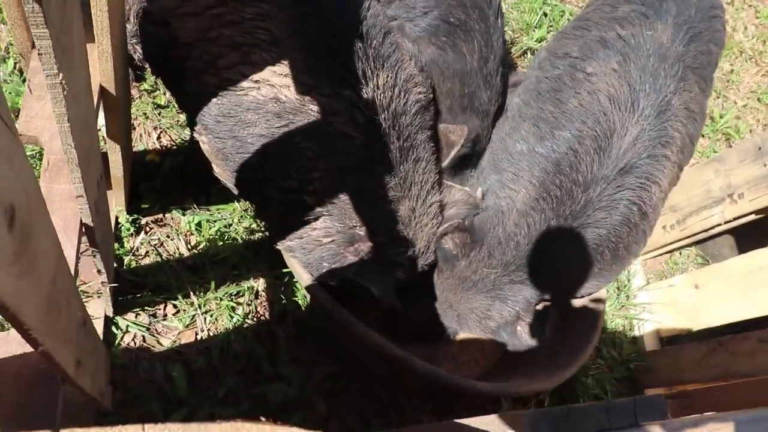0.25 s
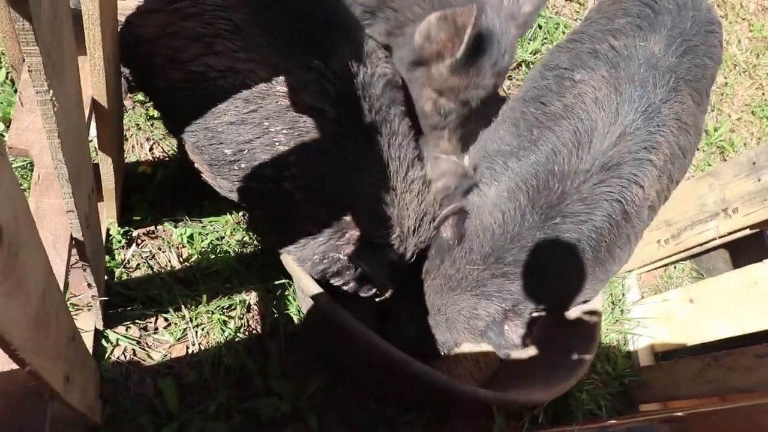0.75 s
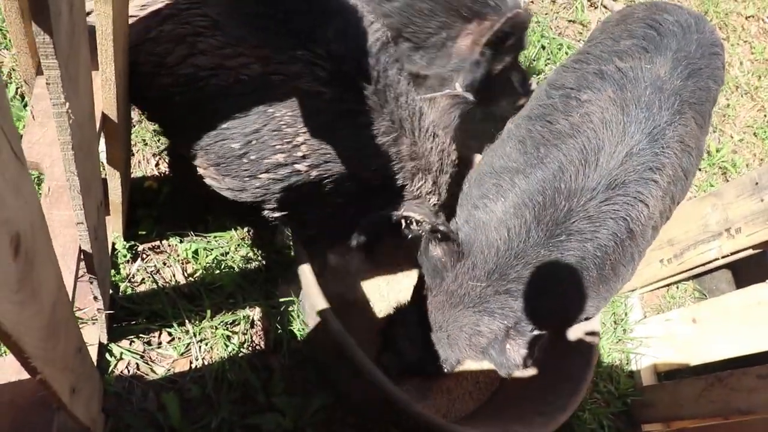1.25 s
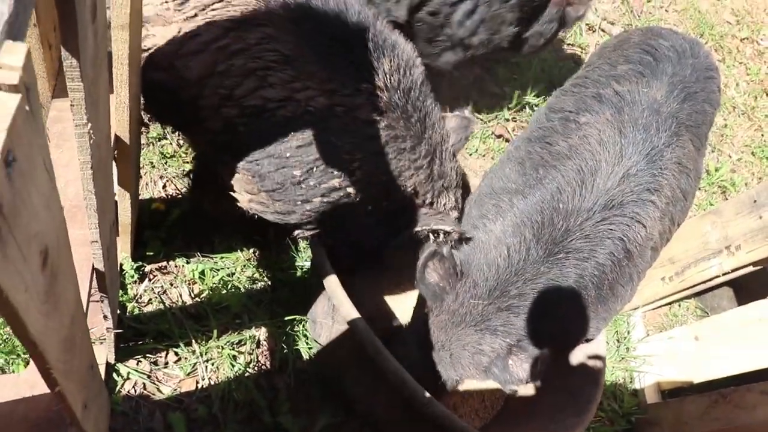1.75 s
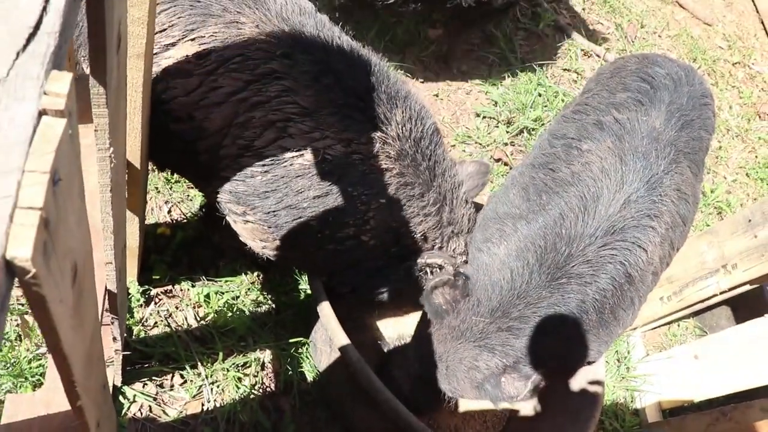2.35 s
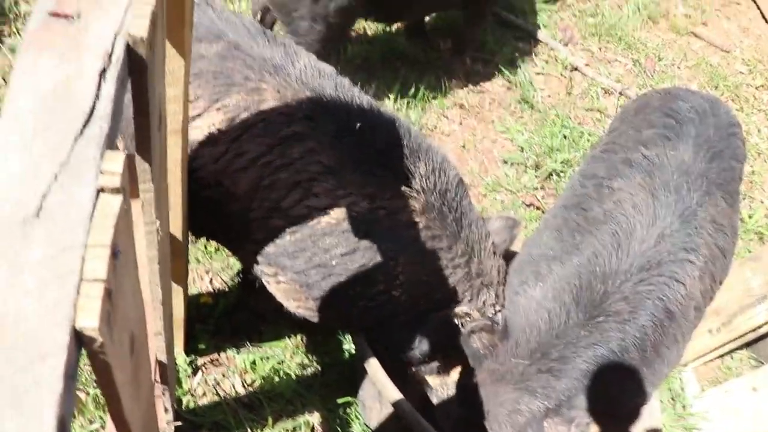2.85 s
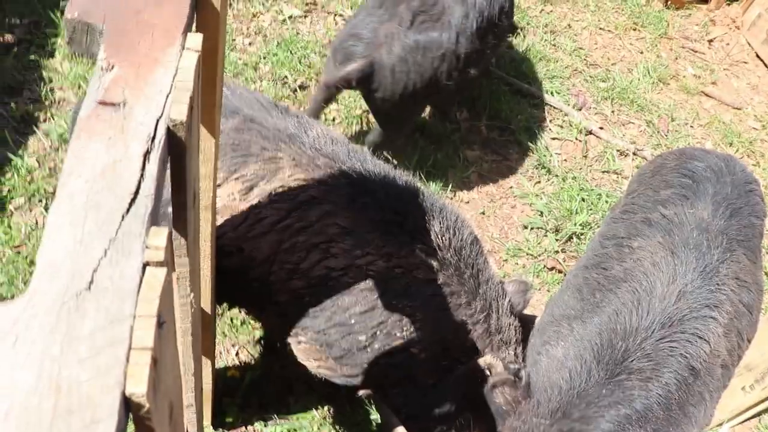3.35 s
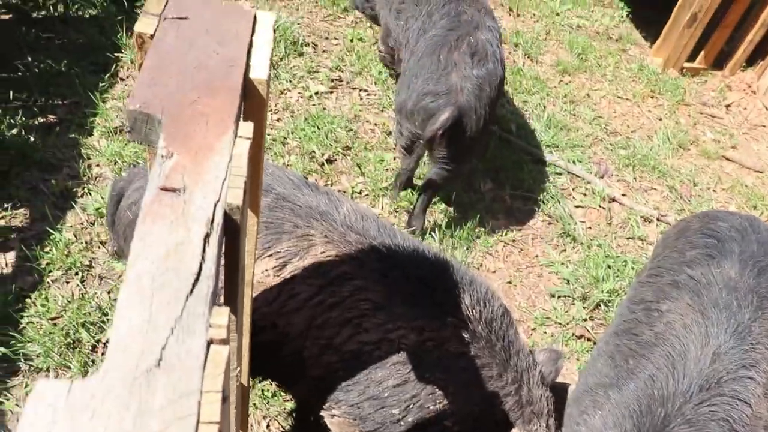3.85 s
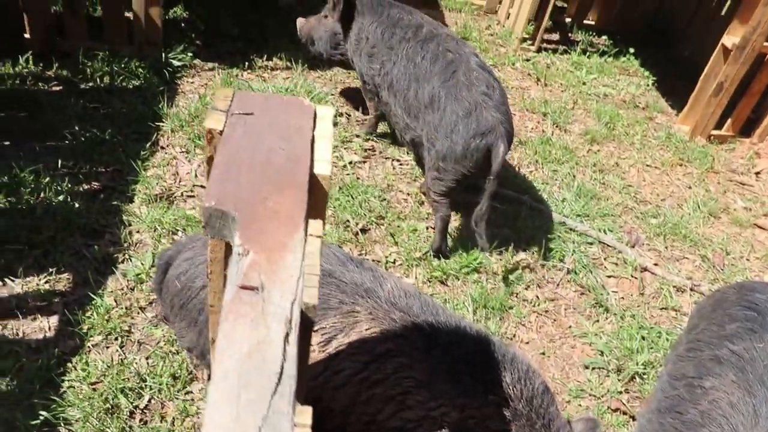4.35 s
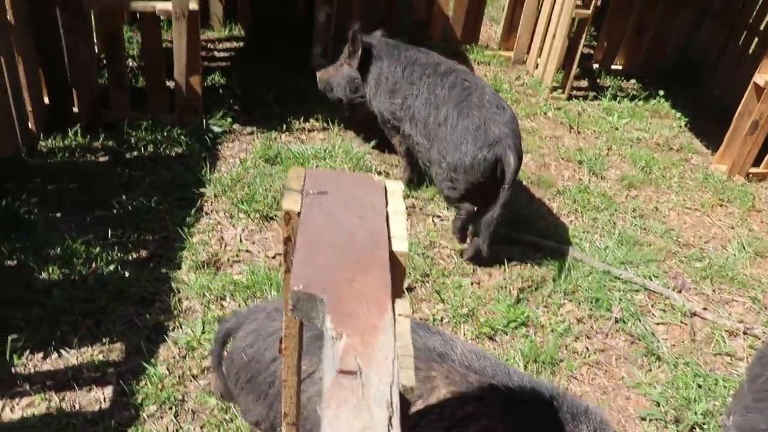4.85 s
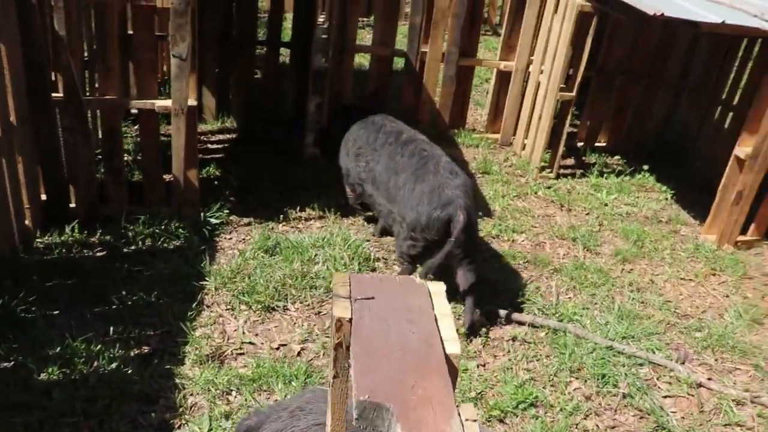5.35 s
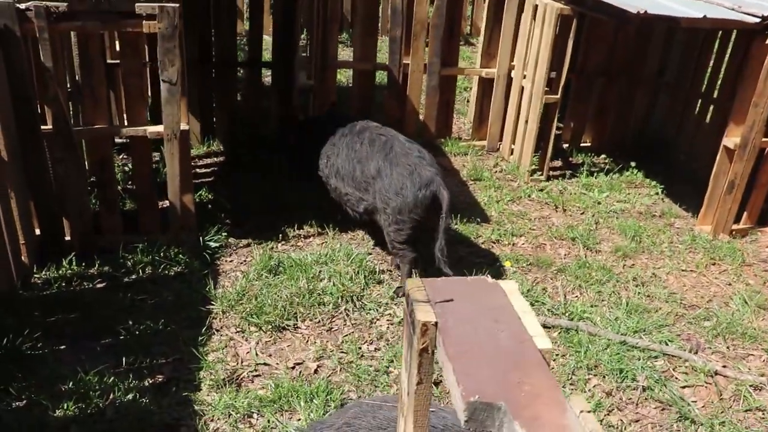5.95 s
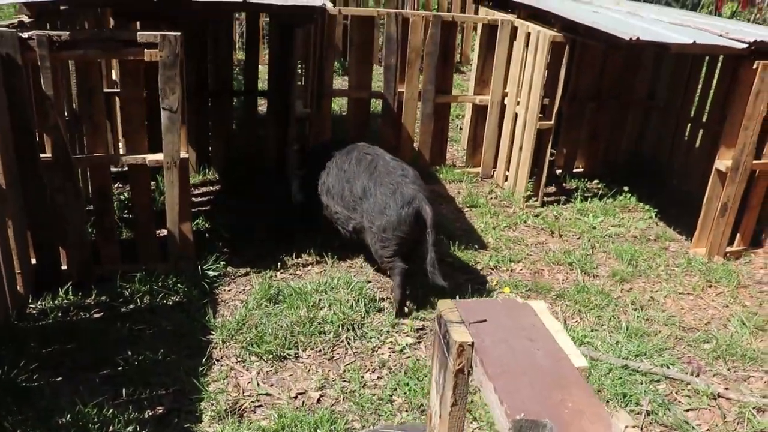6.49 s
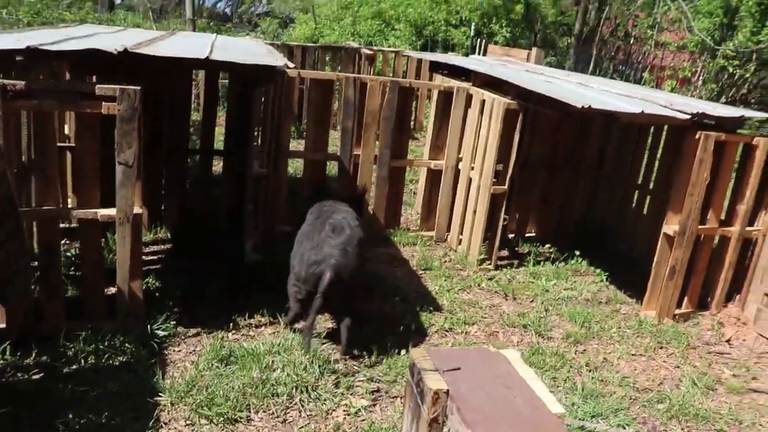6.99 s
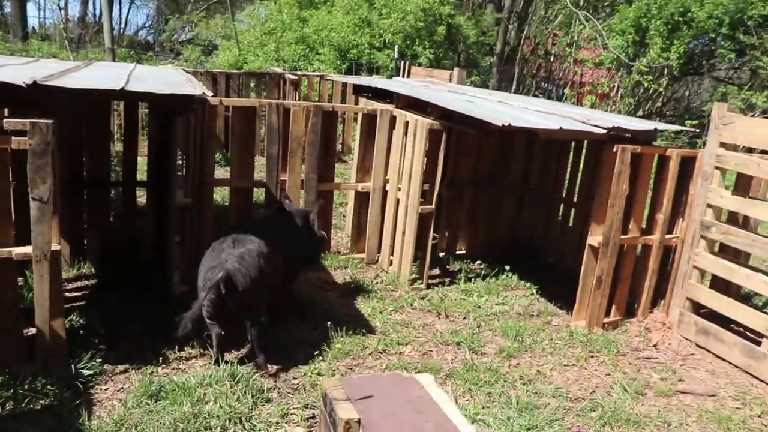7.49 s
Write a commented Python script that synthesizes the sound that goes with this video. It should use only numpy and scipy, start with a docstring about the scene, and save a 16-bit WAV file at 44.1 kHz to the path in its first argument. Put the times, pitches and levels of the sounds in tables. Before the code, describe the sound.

Close smacking and crunching of pigs eating outdoors, with a brief creaky grunt, a snuffle and occasional bumps on their feed pan.

```python
"""An outdoor pen, with a small microphone close to pigs feeding from a pan.
Jaws squelch wet feed and crackle dry grain, single grains split, and lips smack as they part.
Snouts rub the pan along the ground and knock its wall. One pig gives a short creaky grunt, slow
claps of the vocal folds ringing in its throat; one snuffles, air fluttering in its nostrils.
A faint open-air hiss and rumble lies behind it all."""
import sys
import numpy as np
from scipy import signal
from scipy.fft import rfft, irfft, next_fast_len
from scipy.io import wavfile
from scipy.ndimage import uniform_filter1d

SR = 44100
rng = np.random.default_rng(int(sys.argv[2]) if len(sys.argv) > 2 else 0)


def dump_mix(stems):
    """Bounce the given channels to the path in sys.argv[1] as a 16-bit WAV at rate SR."""
    frames = np.atleast_2d(stems).T  # one column per channel
    limited = np.clip(frames, -1, 1)  # hard clip at full scale
    pcm = np.round(limited * 32767).astype(np.int16)
    wavfile.write(sys.argv[1], SR, pcm)


N = 340602


def gain_of(db):
    """Decibels to amplitude."""
    return 10 ** (np.asarray(db) / 20)


def evened(x):
    """Scales to rms 1."""
    return x / np.sqrt(np.mean(x ** 2) + 1e-20)


def curve(rows, column):
    """One column of a timed table, sample by sample."""
    rows = np.array(rows)
    return np.interp(np.arange(N) / SR, rows[:, 0], rows[:, column])


def add(mix, s, sound):
    """Mixes a sound in at s seconds."""
    part = mix[round(s * SR):][:len(sound)]
    part += sound[:len(part)]


def coloured(x, spectrum):
    """Shapes x by rows of (frequency [Hz], gain [dB]), then scales to rms 1."""
    size = next_fast_len(len(x))
    hz, db = np.transpose(spectrum)
    shape = np.interp(np.log(np.fft.rfftfreq(size, 1 / SR) + 1), np.log(hz + 1), db)
    return evened(irfft(rfft(x, size) * gain_of(shape), size)[:len(x)])


def no_bass(x, hz):
    """Rolls off what lies under hz."""
    return signal.sosfilt(signal.butter(2, hz, "high", fs=SR, output="sos"), x)


def ring(x, hz, width):
    """A two-pole resonance, width in Hz, whose impulse starts as a unit sine."""
    r, w = np.exp(-np.pi * width / SR), 2 * np.pi * hz / SR
    return signal.lfilter([0, np.sin(w)], [1, -2 * r * np.cos(w), r * r], x)


def resonate(x, hz, width):
    """A resonance that follows a pitch curve: shift down, smooth, shift back."""
    turn, r = np.exp(2j * np.pi * np.cumsum(hz) / SR), np.exp(-np.pi * width / SR)
    return (turn * signal.lfilter([1 - r], [1, -r], x / turn)).real


def grainy(per_s, spread_db, fade_s, hiss):
    """Noise broken into little bursts of uneven size over a steady share of hiss."""
    sizes = gain_of(spread_db * np.minimum(rng.exponential(1, N), 4))
    onsets = rng.random(N) < per_s / SR
    bursts = evened(signal.lfilter([1], [1, -np.exp(-1 / (fade_s * SR))], sizes * onsets))
    return (hiss + bursts) * rng.standard_normal(N)


def open_air():
    """Steady outdoor rumble and faint high hiss around the pen."""
    # colour of the air: (frequency [Hz], gain [dB])
    spectrum = [(12, -31), (20, 10.5), (108, 13), (323, 2.5), (1240, -28), (1840, -42), (6710, -36),
                (8650, -13), (10500, -9), (15200, -15), (16500, -24)]
    return gain_of(-52.5) * coloured(rng.standard_normal(N), spectrum)


def pan():
    """Snouts rub the pan along the ground and now and then knock its wall into ringing."""
    # blows, low for a shove, high near the rim: (time [s], peak [dB], pitch [ratio])
    knocks = [(0.785, -22.5, 0.44), (1.039, -17.5, 1.03), (1.155, -9, 2.17), (1.157, -16.5, 0.663),
              (1.161, -12.5, 1.44), (1.575, -23.5, 1.93), (4.9786, -6, 1.04), (5.75, -26.5, 1.02),
              (5.794, -28, 1.64), (6.024, -27.5, 1.36)]
    # wall modes at pitch 1: (frequency [Hz], gain [dB], time to fall 60 dB [s])
    modes = [(400, -6, .045), (495, 0, .024), (810, -11, .025), (1570, -13, .02), (2100, -5, .02),
             (2420, -8, .016), (2750, -9, .013)]
    # snouts push hard at first, then mostly nudge: (time [s], level [dB])
    shoves = [(0.0, -42), (0.45, -40), (1.4, -44.5), (1.65, -42), (2.47, -40.5), (2.79, -52.5), (3.8, -47),
              (4.1, -54.5), (6.45, -53), (6.65, -41.5), (6.9, -60), (7.72, -48.5)]
    # pan scraping the ground: (frequency [Hz], gain [dB])
    rub_spectrum = [(71, -57), (120, -6), (330, -7.5), (410, 3), (480, -4), (600, 1.5), (720, -6),
                    (800, -4.5), (1100, -28), (2640, -90)]
    out, t = np.zeros(N), np.arange(3000) / SR
    for s, db, pitch in knocks:
        reach_hz = 4800 * gain_of(.5 * db)  # weaker blows are duller
        blow = np.zeros(len(t))
        for hz, mode_db, t60 in modes:
            mode = gain_of(mode_db - 60 * t / t60) * np.sin(2 * np.pi * hz * pitch * t)
            blow += mode / (1 + (hz * pitch / reach_hz) ** 4)
        blow *= 1 - np.exp(-t / .0004)
        blow = no_bass(no_bass(blow, 300 * pitch), 300 * pitch)  # a thin wall radiates little bass
        blow /= abs(blow).max()
        add(out, s, gain_of(db) * blow)
        add(out, s + .0135, gain_of(db - 17) * blow)  # echo from the fence
    rub = coloured(grainy(per_s=90, spread_db=2.5, fade_s=.015, hiss=1.3), rub_spectrum)
    return out + gain_of(curve(shoves, 1)) * rub


def snuffle():
    """Fluttering air in the nostrils; two resonances rise as the snout digs in."""
    # one long breath: (time [s], level [dB], lower nasal resonance [Hz])
    breath = [(1.93, -67, 2000), (2.02, -43.5, 2070), (2.22, -35.5, 2320), (2.33, -45, 2380),
              (2.46, -61, 2500)]
    out, t = np.zeros(N), np.arange(N) / SR
    flutter = grainy(per_s=140, spread_db=1.0, fade_s=.0035, hiss=2.4)
    for ratio, width_hz, db in ((1, 350, -2), (1.4, 220, -8.5)):
        turn = np.exp(2j * np.pi * np.cumsum(ratio * curve(breath, 2)) / SR)
        r = np.exp(-np.pi * width_hz / SR)
        nasal = turn * signal.lfilter([1], [1, -2 * r, r * r], flutter / turn)
        out += gain_of(db) * evened(nasal.real)
    return out * gain_of(curve(breath, 1)) * (t > breath[0][0]) * (t < breath[-1][0])


def grunt():
    """Slow single claps of the vocal folds, each ringing out in the throat."""
    # throat modes in three registers: (frequency [Hz], width [Hz], gain [dB])
    low_modes = [(239, 28, 1)]
    mid_modes = [(1306, 104, 9), (943, 140, 2), (2018, 50, -0.5), (2780, 290, -0.5)]
    top_modes = [(3280, 48, -5)]
    start_s, strongest_s, end_s, claps_per_s = .223, .295, .40, 41.2
    swell_db_per_s, sag_db_per_s, shut_share = 298, 28, .68
    t, claps = np.arange(N) / SR, np.zeros(N)
    cycle = (t - start_s) * claps_per_s % 1
    sounding = t < end_s + .01

    clap_s = np.arange(start_s, end_s, 1 / claps_per_s)
    clap_s += .0004 * rng.standard_normal(len(clap_s))
    late = clap_s - strongest_s
    effort_db = np.minimum(swell_db_per_s * late, -sag_db_per_s * late)
    claps[(clap_s * SR).astype(int)] = gain_of(effort_db - 17.5)
    puff = .12 * np.exp(-np.arange(500) / 160) * rng.standard_normal(500)  # air leaks after each clap
    puff[:9] = np.hanning(11)[1:-1] / 4  # the clap itself
    claps = signal.oaconvolve(claps, puff)[:N]
    claps = signal.sosfilt(signal.butter(4, 4600, fs=SR, output="sos"), claps)  # soft folds close gently

    low, mid, top = (
        sum((-1) ** k * gain_of(db) * ring(claps, hz, width) for k, (hz, width, db) in enumerate(modes))
        for modes in (low_modes, mid_modes, top_modes))
    accent = np.exp(-((t - strongest_s - .006) / .012) ** 4)  # the hardest clap wakes the middle modes
    mouth_open = (1 + np.tanh((t - .31) / .035)) / 2
    upper = mid * gain_of(-6.5 + 9 * accent) + top * gain_of(-28 + 31 * mouth_open)
    folds_shut = (t - start_s + .002) * claps_per_s % 1 < shut_share
    upper *= uniform_filter1d(1. * folds_shut, size=130) * sounding  # these modes die as the folds part

    leak = np.exp(-((cycle - .3) / .17) ** 2) * mouth_open ** 9 * sounding
    whistle_hz = 4150 + 900 * cycle  # air through the folds, climbing in each cycle
    whistle = resonate(rng.standard_normal(N), whistle_hz, width=220)
    whistle = evened(resonate(whistle, whistle_hz, width=220))
    return no_bass(low + upper + gain_of(-33) * leak * whistle, 40)


def squelch():
    """Pockets of air burst in wet feed: brief puffs, each size ringing at its own pitch."""
    out = np.zeros(N)
    for hz in np.geomspace(800, 4500, 12):
        puffs = grainy(per_s=14, spread_db=2.2, fade_s=.006, hiss=.5)
        out += evened(ring(puffs, hz, width=.22 * hz)) * np.sqrt(hz)
    return evened(out)


def crackle():
    """Dry grains snap: very short ticks, each size with its own colour."""
    out = np.zeros(N)
    for hz in np.geomspace(3500, 14000, 6):
        ticks = grainy(per_s=30, spread_db=4.5, fade_s=.0007, hiss=.3)
        out += evened(ring(ticks, hz, width=.5 * hz)) * np.sqrt(hz)
    return evened(out)


def chewing(column):
    """Amplitude of the wet (1) or dry (2) feed: steady munching plus a swell at every bite."""
    # steady munching: (time [s], wet level [dB], dry level [dB])
    munching = [(0.0, -33, -52), (0.08, -37, -61), (0.17, -44, -54), (0.42, -40, -47), (0.6, -35, -38.5),
                (0.84, -50, -54.5), (0.99, -36.5, -35.5), (1.2, -35.5, -46.5), (1.42, -42.5, -42),
                (1.95, -44.5, -57.5), (2.15, -41, -42.5), (2.5, -43, -52.5), (2.92, -41, -40.5),
                (3.4, -46, -57), (4.9, -45.5, -49.5), (5.14, -40.5, -44), (5.48, -47.5, -51),
                (6.3, -48.5, -59), (7.46, -48.5, -60), (7.72, -37.5, -48.5)]
    # jaw closings: (time of the top [s], wet level [dB], dry level [dB], time scale [s])
    bites = [(0.709, -31.5, -52, 0.097), (1.107, -34.5, -67, 0.093), (1.505, -42, -35, 0.029),
             (1.638, -35, -41.5, 0.083), (1.766, -36, -49, 0.066), (2.042, -39, -37.5, 0.14),
             (2.244, -34.5, -78, 0.11), (2.515, -40, -55, 0.031), (2.941, -59, -32.5, 0.029),
             (3.135, -37, -43, 0.046), (3.456, -53, -48.5, 0.17), (3.624, -45.5, -44, 0.14),
             (3.83, -45, -46, 0.15), (4.123, -53, -37.5, 0.16), (4.539, -41.5, -34, 0.082),
             (4.648, -38, -46.5, 0.067), (4.976, -38, -52, 0.026), (5.286, -43.5, -39, 0.052),
             (5.549, -38, -54, 0.047), (5.703, -38.5, -61, 0.13), (5.93, -46, -42.5, 0.019),
             (6.084, -44, -57.5, 0.39), (6.545, -37, -52, 0.1), (6.708, -47, -55, 0.17),
             (6.964, -40, -48, 0.065), (7.035, -44, -46, 0.043), (7.192, -48, -47.5, 0.13),
             (7.467, -39.5, -65, 0.052), (7.555, -37.5, -70, 0.037)]
    level, t = gain_of(curve(munching, column)), np.arange(N) / SR
    for bite in bites:
        near = slice(max(round((bite[0] - .2) * SR), 0), round((bite[0] + .169) * SR))
        late = (t[near] - bite[0]) / bite[3]
        steepness = np.where(late < 0, 2.8, 1.6)  # quick in, slow out
        level[near] += gain_of(bite[column]) * np.exp(-(steepness * late) ** 2)
    return level


def jaws():
    """Between the jaws, wet feed slops and pops while dry grain crackles in fine ticks."""
    # colours of wet and dry feed: (frequency [Hz], gain [dB])
    wet_spectrum = [(350, 0), (600, 2), (693, 3), (869, 4), (1300, 4.5), (1800, 0.5), (3370, -3.5),
                    (4690, -5.5), (7000, -6), (9100, -10), (15400, -120)]
    dry_spectrum = [(1760, -16), (3000, 2.5), (3800, -3), (4800, 5), (6390, 2), (8560, 9.5), (10700, -1),
                    (13500, 6), (15900, -5), (16500, -40)]
    slop = evened(grainy(per_s=140, spread_db=5.0, fade_s=.02, hiss=.9))
    wet = coloured(slop + .6 * squelch(), wet_spectrum)
    crunch = evened(grainy(per_s=150, spread_db=4.5, fade_s=.003, hiss=.5))
    dry = coloured(crunch + .9 * crackle(), dry_spectrum)
    return chewing(1) * wet + chewing(2) * dry


def grain_cracks():
    """A hard grain splits: a sharp ringing tick and a short spray of fragments behind it."""
    # splitting grains: (time [s], level [dB])
    cracks = [(1.495, -26), (1.625, -22), (1.698, -17.5), (1.9562, -19), (2.03, -2.5), (2.059, -18.5),
              (2.108, -18.5), (2.157, -10.5), (2.3, -15), (2.93, -15), (3.257, -43), (3.815, -15.5),
              (4.194, -15), (4.3095, -22), (4.524, -6), (4.5291, -8), (4.906, -24), (5.119, -13),
              (5.238, -19.5), (5.2699, -23), (5.663, -16), (6.115, -20), (6.144, -20.5), (6.3882, -20.5),
              (6.45, -24.5), (6.4646, -22), (6.592, -14.5), (6.6603, -19.5), (6.878, -22), (7.1806, -21.5),
              (7.2826, -24)]
    out, t = np.zeros(N), np.arange(1500) / SR
    spray = .3 * np.exp(-t / .0005) + .07 * gain_of(-60 * t / .04)
    for s, db in cracks:
        burst = spray * rng.standard_normal(len(t))
        burst[0] = 1  # the tick
        add(out, s, gain_of(db) * burst)
    ringing = 1.3 * out + .9 * ring(out, 8500, width=2200)
    return no_bass(no_bass(ringing, 4200), 4200)


def lip_smacks():
    """Close up, a wet tearing burst rings the hollow mouth; a bright snap of the lips rides on it."""
    # lips part: (time [s], level [dB], nominal mouth pitch [Hz], snap brightness [0-1])
    smacks = [(0.54, -24, 1140, 0), (1.082, -17.5, 720, 0.76), (1.109, -21, 1300, 0.2),
              (1.178, -17, 990, 0), (1.226, -21.5, 1510, 0.94), (1.272, -24, 1520, 0.1),
              (1.398, -29.5, 890, 0.86), (1.664, -21, 1400, 1), (1.756, -27.5, 1060, 0.9),
              (1.955, -25.5, 1210, 0.99), (2.25, -20.5, 940, 0), (2.744, -27.5, 2360, 0.95),
              (2.782, -24.5, 1260, 1), (3.015, -31, 1330, 1), (3.113, -30, 1740, 1),
              (3.139, -19.5, 2830, 0.9), (3.333, -28.5, 1310, 0.7), (3.47, -31.5, 1310, 1),
              (3.644, -19.5, 4160, 1), (3.762, -26, 1310, 0.8), (3.827, -26.5, 1200, 0.3),
              (3.866, -25, 1420, 0.5), (3.897, -26.5, 1220, 0.84), (4.018, -36, 1530, 1),
              (4.172, -26.5, 1310, 1), (4.345, -24, 1180, 0.66), (4.434, -32.5, 3380, 0.7),
              (4.626, -24.5, 1350, 0), (4.645, -20, 2200, 0), (5.161, -27, 1340, 0),
              (5.203, -28.5, 3230, 0.14), (5.254, -23.5, 1050, 0), (5.36, -27.5, 1440, 0),
              (5.546, -27, 1200, 0.2), (5.608, -30, 1440, 0), (5.714, -26, 1430, 0), (5.899, -23, 1430, 0),
              (5.927, -29, 1330, 0), (6.062, -20.5, 1310, 0.46), (6.18, -31, 1290, 0),
              (6.53, -23.5, 1190, 0.9), (6.548, -25, 1510, 1), (6.706, -24.5, 1056, 0.66),
              (6.962, -28, 1150, 0.7), (6.982, -25, 910, 1), (7.011, -29.5, 3960, 0.93),
              (7.019, -24, 1830, 0.1), (7.031, -29, 4350, 0.9), (7.22, -26, 1260, 0.64),
              (7.332, -31, 970, 0), (7.466, -27.5, 1280, 0.97), (7.552, -15.5, 1550, 0.2)]
    out, t = np.zeros(N), np.arange(3500) / SR
    tears = rng.standard_normal((len(smacks), len(t)))
    tears[:, 40] = 6  # the seal breaks with one sharp pull
    tears *= 1 - np.exp(-t / .00089)
    snap_pitches = rng.uniform(2560, 4660, len(smacks))
    glide = .954 + 6.4 * t  # the mouth pitch climbs as the lips open
    for (s, db, mouth_hz, bright), tear, snap_hz in zip(smacks, tears, snap_pitches):
        hollow = resonate(tear * gain_of(-60 * t / .049), mouth_hz * glide, width=118)
        lips = tear * gain_of(-60 * t / .045)
        snap = evened(ring(lips, 2600, width=2000)) + .3 * evened(ring(lips, snap_hz, width=320))
        snap = no_bass(snap, 1100)
        snap *= gain_of(-24 + 27 * bright) / abs(snap).max()
        add(out, s, gain_of(db) * (hollow / abs(hollow).max() + snap))
    return no_bass(out, 290)


def scene():
    """The pigs at close range over the open air, in mono."""
    return (open_air() + grunt() + snuffle() + jaws() + lip_smacks() + grain_cracks() + pan())[None]


def record(dry):
    """The recorder behind the microphone cuts the treble above 16.2 kHz."""
    band_limit = signal.firwin(255, 16200, window=("kaiser", 9), fs=SR)
    return signal.oaconvolve(dry, band_limit[None], "same")


dry = scene()
out = record(dry)
dump_mix(out)
```